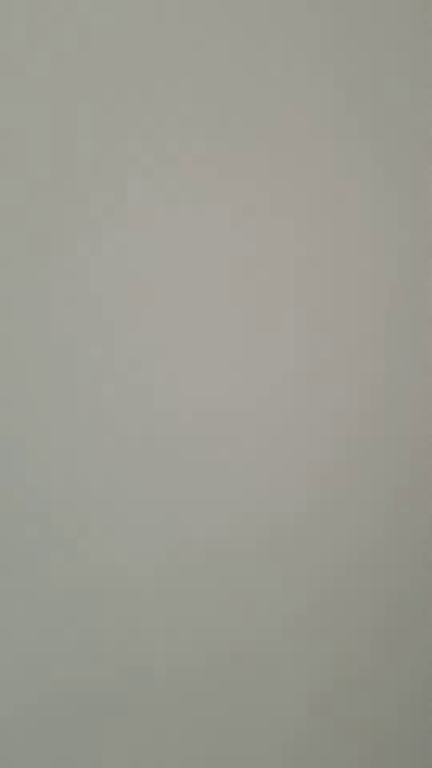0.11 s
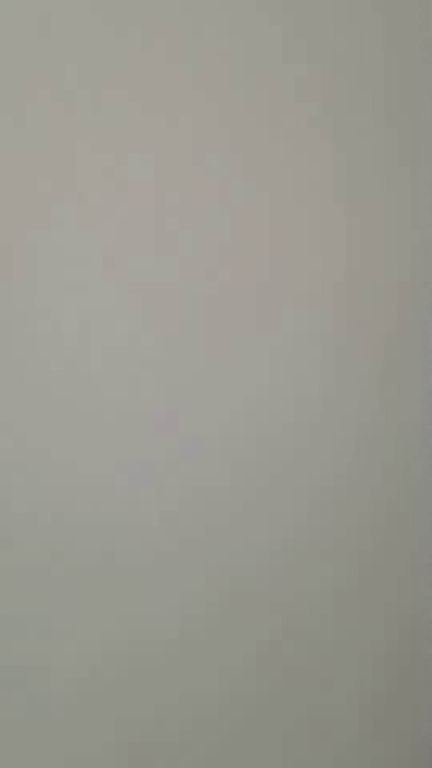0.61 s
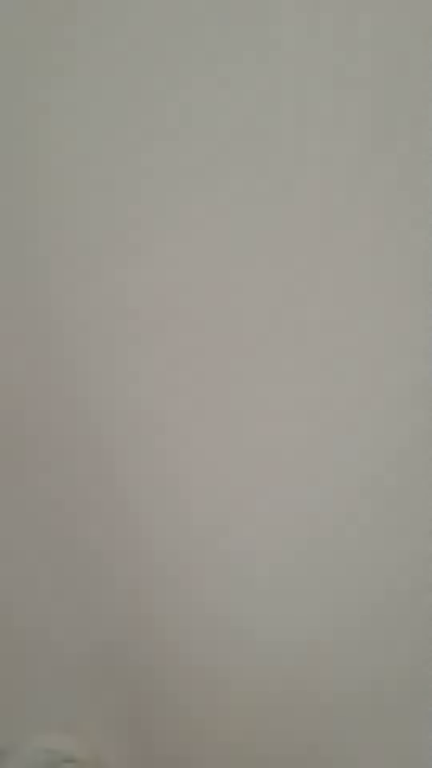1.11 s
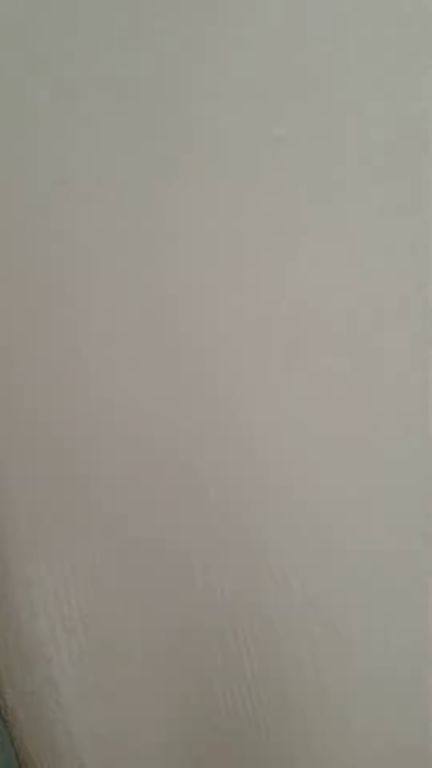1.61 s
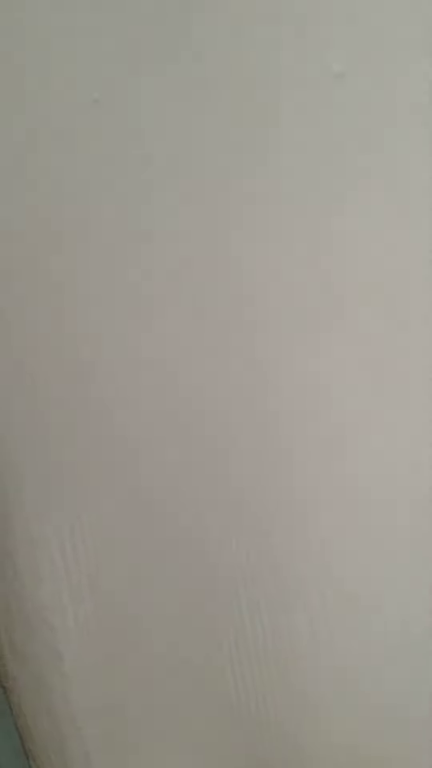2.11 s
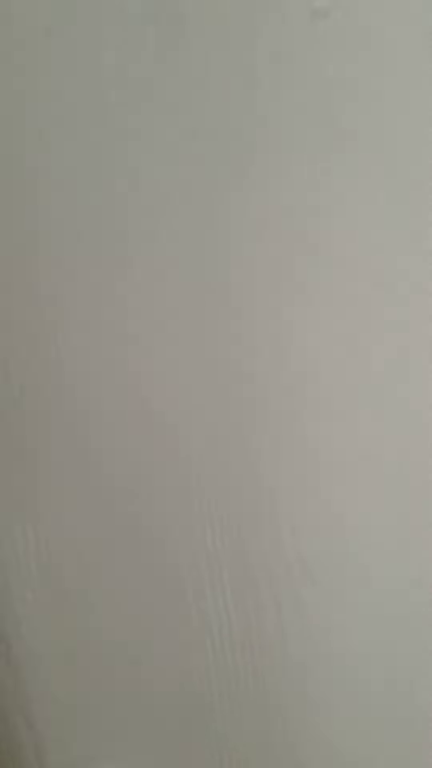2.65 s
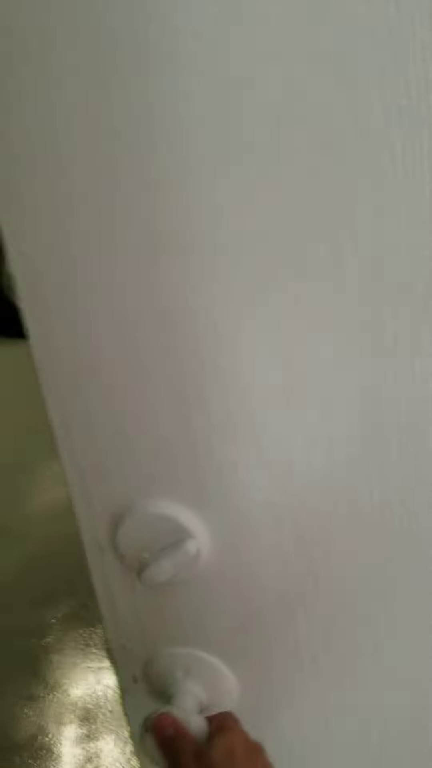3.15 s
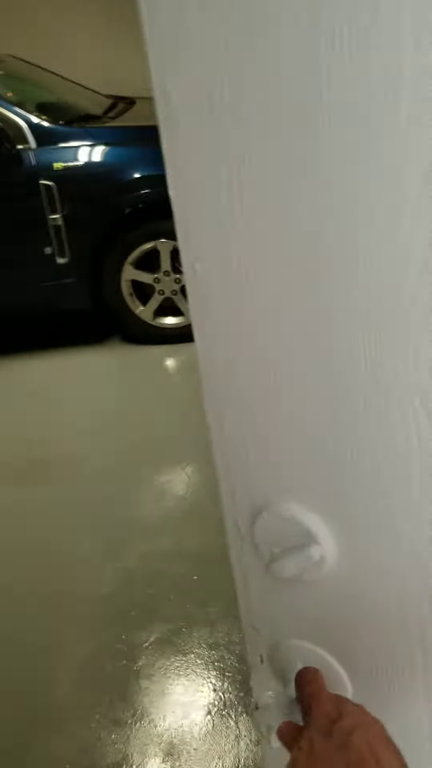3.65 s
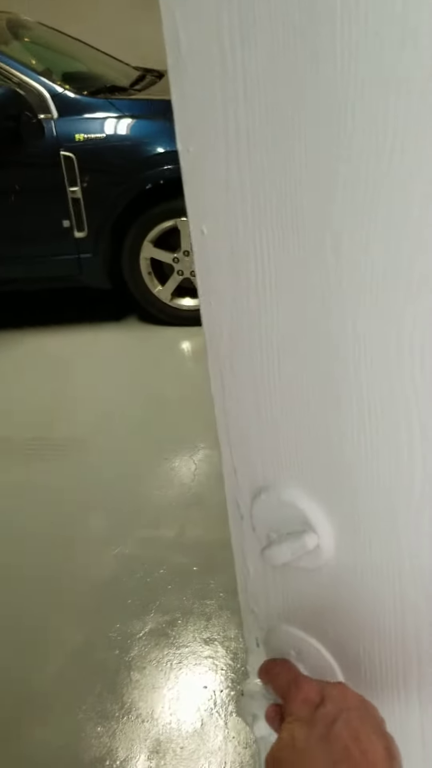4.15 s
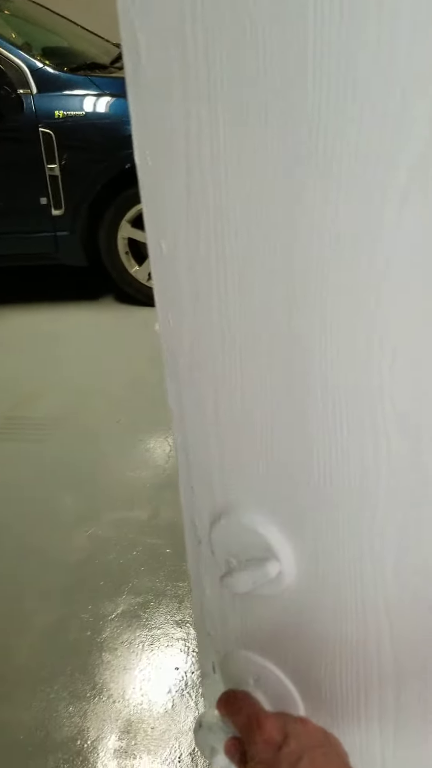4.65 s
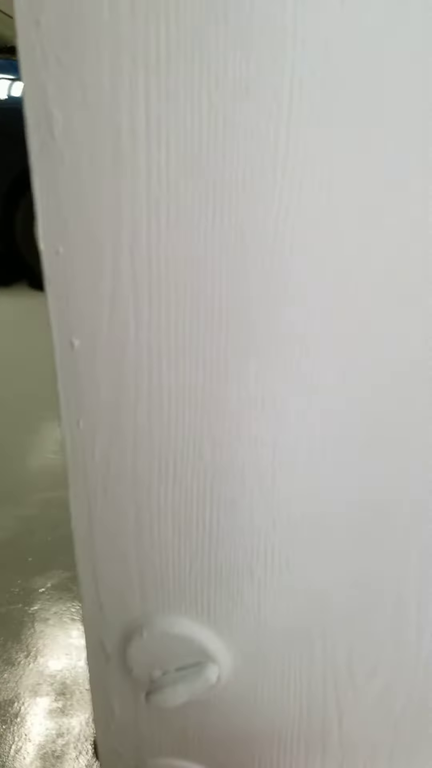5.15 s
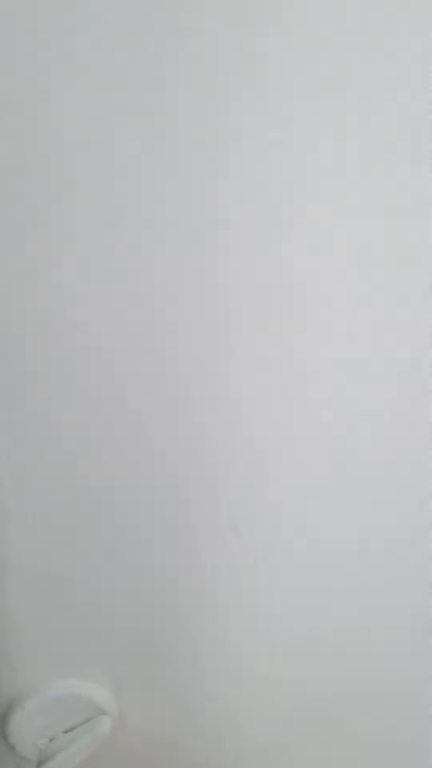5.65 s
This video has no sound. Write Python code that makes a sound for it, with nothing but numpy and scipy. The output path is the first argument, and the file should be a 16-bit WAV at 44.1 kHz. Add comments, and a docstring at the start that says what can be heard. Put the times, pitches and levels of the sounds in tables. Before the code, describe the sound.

Handheld stereo microphone near a door leading to a garage. Quiet rumble and thin hiss, soft handling taps, a small lock click. Then knob and latch rattle, the seal scrapes free, metal clacks and wooden thumps pile up, the hinges judder softly. Nearly two seconds of hush with a faint drone, then a brief rubbing groan and a hard, bright latch clack, abruptly ending.

```python
"""A few soft taps close by come first, then a hand works the lock and knob of a heavy painted door, pulls it
out of its seal, holds it open and pushes it back. Clicks and knocks are noisy contacts that ring the modes of
lock and leaf; the rubbing seal is grainy noise, the hinges judder in low jolts, and the sweep groans on the sill
by slipping many times a second. Moving air, a house rumble and a thin hiss lie below as coloured noise; they sink
while the door stands open and again at the very end. A steady drone comes from the next space."""
import sys
import numpy as np
from scipy import signal
from scipy.fft import rfft, irfft
from scipy.io import wavfile

SR = 44100
rng = np.random.default_rng(int(sys.argv[2]) if len(sys.argv) > 2 else 0)


def master_out(mix):
    """Clip the mix to full scale and print it as 16-bit PCM to the path in sys.argv[1]."""
    frames = np.transpose(np.atleast_2d(mix))
    ceiling = np.clip(frames, -1, 1)
    pcm = np.round(ceiling * 32767).astype(np.int16)
    wavfile.write(sys.argv[1], SR, pcm)


def elevation(decibels):
    """Turn decibel levels (scalar or array-like) into linear amplitude ratios."""
    levels = np.asarray(decibels, float)
    return 10 ** (levels / 20)


N = 254016   # samples, 5.76 s

# modes of the door leaf: pitch_hz, level_db, t60_s
LEAF_MODES = [(125, -16.5, 0.053), (149.7, -6.5, 0.18), (220.5, -0.5, 0.041), (320, 1.5, 0.032),
              (351.4, -4, 0.082), (398, -8, 0.065), (474, -7, 0.063)]
# bright spectrum shared by the metal cracks and the rubbing: pitch_hz, level_db (per Hz)
SHEEN_SPECTRUM = [(2500, -17), (3500, 4), (4400, 3), (5600, -0.5), (7600, -1.5), (8500, -5.5), (9300, -1),
                  (12200, 0.5), (15700, -2.5), (16200, -44)]


def rms_one(x):
    """Scale to unit power."""
    return x / np.sqrt(np.mean(x ** 2) + 1e-20)


def peak_one(x):
    """Scale to unit height."""
    return x / np.max(np.abs(x))


def in_time(rows, before=None, after=None):
    """Read the columns of a curve at every sample; the first column is time in seconds."""
    s, *columns = np.transpose(rows)
    return [np.interp(np.arange(N) / SR, s, column, before, after) for column in columns]


def at_hz(points, hz):
    """Read a spectrum on a log-frequency axis."""
    point_hz, value = np.transpose(points)
    return np.interp(np.log(hz), np.log(point_hz), value)


def add(out, s, sound):
    """Mix a sound in at its time in seconds."""
    at = round(s * SR)
    out[:, at:at + sound.shape[1]] += sound[:, :N - at]


def panned(x, db):
    """Place a sound by its level difference, left minus right, in dB."""
    return x * elevation([[db / 2], [-db / 2]])


def drift(rate_hz):
    """Slow random wander of spread 1: white noise through two equal poles, run at SR / 40."""
    pole = np.exp(-80 * np.pi * rate_hz / SR)
    settle = 2000   # slow samples dropped while the filter settles
    noise = rng.standard_normal(N // 40 + settle + 2)
    slow = signal.lfilter([1], [1, -2 * pole, pole ** 2], noise)[settle:]
    return np.interp(np.arange(N) / 40, np.arange(len(slow)), rms_one(slow))


def ring(force, hz, t60):
    """A click sets a sine of about its height ringing; nothing passes far below the pitch."""
    radius = elevation(-60 / (max(t60, .002) * SR))
    turn = 2 * np.pi * hz / SR
    return signal.lfilter([.5, 0, -.5], [1, -2 * radius * np.cos(turn), radius ** 2], force + 1e-18)


def tinted(x, spectrum):
    """Pass a short sound through a spectrum, without shifting its phase."""
    hz = np.maximum(np.arange(x.shape[-1] // 2 + 1) * SR / x.shape[-1], 1)
    return irfft(rfft(x) * elevation(at_hz(spectrum, hz)), x.shape[-1])


def coloured(spectrum, lumpy_db, grain_db):
    """Stereo noise of a given spectrum and grain, wavering in level; rms 1."""
    # how alike the two microphones hear a noise: pitch_hz, likeness (1 = the same in both)
    likeness = [(75, 0.71), (125, 0.92), (300, 0.86), (600, 0.53), (1500, 0.0), (16000, 0)]
    hz = np.maximum(np.arange(N // 2 + 1) * SR / N, 1)
    grains = elevation(grain_db * np.minimum(rng.exponential(1, N), 6))
    mid, side = rfft(rng.standard_normal((2, N)) * grains) * elevation(at_hz(spectrum, hz))
    alike = np.clip(at_hz(likeness, hz), -1, 1)
    pair = np.sqrt(1 + alike) * mid + np.sqrt(1 - alike) * side * [[1], [-1]]
    waver_db = lumpy_db * (drift(24) + drift(1.64))
    return rms_one(irfft(pair, N) * elevation(waver_db))


def rattle(t60, rise_s):
    """A short dying run of uneven contacts, with separate noise left and right."""
    t = np.arange(SR // 3) / SR
    dying = (1 - np.exp(-t / rise_s)) * elevation(-60 * t / max(t60, .002))
    uneven = elevation(2.78 * np.minimum(rng.exponential(1, len(t)), 5))
    return rng.standard_normal((2, len(t))) * dying * uneven


def struck_modes(force, modes, centre_hz, slope_db, reach):
    """Modes near the pitch of the blow ring most; the contact is too soft to reach far above it."""
    lowpass = signal.butter(4, min(reach * centre_hz, 9500), fs=SR, output="sos")
    soft = signal.sosfilt(lowpass, force)
    out = 0
    for (hz, db, t60), spread_db in zip(modes, rng.normal(0, 2, len(modes))):
        off_centre_db = slope_db * np.log2(hz / centre_hz) ** 2
        out = out + elevation(db + spread_db - off_centre_db) * ring(soft, hz, t60)
    return peak_one(out)


def clicks():
    """Latch, bolt and knob: each click is a rattle that rings the lock and cracks in the treble."""
    # modes of the lock: pitch_hz, level_db, t60_s
    lock_modes = [(650, 4, 0.024), (923, 5.5, 0.016), (1050, 3, .018), (1180, 4, 0.02), (1458, 10, 0.012),
                  (1740, 4.5, 0.026), (1950, 3.5, 0.032), (2080, 8, 0.018), (2450, 1, .012),
                  (2760, -2, 0.021), (3170, 3, 0.013), (3660, -1, 0.016), (4350, 10, 0.018),
                  (5300, 4.5, 0.0072), (6000, 2, 0.0026)]
    # start_s, lock_db and crack_db (peaks before panning), rattle_t60_s, lock_pitch_hz,
    # crack_tilt_db (per octave, about 7600 Hz)
    click_rows = [(0.214, -39, -29, 0.0075, 1500, 10), (0.4313, -43, -43, 0.0055, 2200, -10),
                  (1.156, -37, -58, 0.02, 1820, 3), (1.3819, -15.5, -20, 0.054, 2430, 2),
                  (1.389, -20.5, -25, 0.12, 1920, -9), (1.399, -26.5, -41, 0.23, 1150, -19),
                  (2.352, -30, -34, 0.011, 1960, -1), (2.376, -25, -30, 0.045, 1310, -6.5),
                  (2.384, -21.5, -37, 0.0044, 3100, -1), (2.388, -20, -21.5, 0.024, 1493, 3),
                  (2.411, -25, -22, 0.014, 1430, -7.5), (2.414, -22, -24, 0.08, 1180, 0),
                  (2.486, -22, -21.5, 0.083, 1560, 0), (2.498, -19.5, -36, 0.034, 1210, 0),
                  (2.5825, -30, -5, 0.015, 2500, 14), (2.588, -23, -10, 0.11, 2520, 16),
                  (2.6, -25, -15.5, 0.11, 3050, -9.5), (2.616, -9, -30, 0.12, 1050, -6.5),
                  (2.715, -6.5, -37, 0.024, 1530, -7), (2.73, -39, -15.5, .02, 1500, 11),
                  (2.769, -52, -20, 0.041, 1290, 7), (2.785, -26, -48, 0.017, 2300, -5),
                  (2.806, -21, -40, 0.083, 1060, -4), (2.928, -13.5, -25, 0.087, 1180, 8),
                  (3.16, -32, -29.5, 0.015, 1090, -13), (3.229, -26.5, -28.5, 0.41, 1650, -8),
                  (3.353, -12.5, -27.5, 0.059, 860, -6), (3.4166, -21.5, -30, 0.022, 2520, 9),
                  (5.468, -38, -32, 0.016, 4110, -10), (5.58, -10.5, -12, 0.076, 1980, -3),
                  (5.603, -26, -42, 0.11, 670, 3), (5.615, -37, -13.5, .036, 2200, -0.5),
                  (5.661, -43, -7, 0.022, 2950, -16), (5.664, -7, 1, 0.066, 2720, 0),
                  (5.725, -17.5, -27, 0.18, 1760, 5)]
    lock_side_db, crack_side_db = -5, -1.5   # left minus right
    first_touch = 0.7   # strength of the first touch against the rattle after it
    left_lag = 12   # samples by which the touch reaches the left side later
    lead = 64   # samples kept ahead of the touch for the filters that keep the phase
    out, t = np.zeros((2, N)), np.arange(SR // 3) / SR
    for s, lock_db, crack_db, t60, lock_hz, tilt_db in click_rows:
        force = np.roll(rattle(t60, rise_s=.0005), lead, axis=1)
        touch = np.zeros_like(force)
        touch[[0, 1], [lead + left_lag, lead]] = first_touch * np.linalg.norm(force, axis=1)
        metal = struck_modes(force + touch, lock_modes, lock_hz, slope_db=6.0, reach=2.2)
        sharp = force * (1 + 4.4 * np.exp(-t / 0.0014))   # sharpest at first
        tilted = [(hz, db + tilt_db * np.log2(hz / 7600)) for hz, db in SHEEN_SPECTRUM]
        crack = peak_one(tinted(sharp, tilted))
        click = elevation(lock_db) * panned(metal, lock_side_db) + elevation(crack_db) * panned(crack, crack_side_db)
        add(out, s - lead / SR, click)
    return out


def knocks():
    """Dull knocks: a softer run of contacts, nearly alike left and right, thumps the modes of the leaf."""
    # start_s, peak_db, pitch_hz, contact_t60_s
    knock_rows = [(2.581, -27.5, 125, 0.062), (2.617, -21, 320, 0.088), (2.637, -21, 490, 0.051),
                  (2.714, -14.5, 520, 0.0098), (2.733, -28, 140, 0.034), (2.8, -20, 244, 0.062),
                  (2.821, -13, 405, 0.016), (2.93, -18.5, 155, 0.061), (3.23, -29, 143, 0.32),
                  (3.333, -28, 300, 0.041), (3.354, -23, 244, 0.086), (5.579, -23.5, 374, 0.13),
                  (5.603, -25, 360.4, 0.093), (5.724, -33.5, 324, 0.17)]
    out = np.zeros((2, N))
    for s, db, leaf_hz, t60 in knock_rows:
        force = rattle(t60, rise_s=.003)
        shared = force[0] + 0.21 * force
        add(out, s, elevation(db) * struck_modes(shared, LEAF_MODES, leaf_hz, slope_db=4.9, reach=1.68))
    return out


def rubbing():
    """Dense grains of friction: a middle body, a bright sheen and the leaf shuddering along."""
    # seal and fittings as the door is pulled free, the knob let go, the door pushed home;
    # one list a stroke: time_s, middle_level_db, treble_level_db
    strokes = [
        [(2.3, -55, -85), (2.37, -43.5, -48), (2.43, -35.5, -44), (2.48, -44.5, -49), (2.51, -47, -59),
         (2.57, -39.5, -44), (2.61, -28.5, -24.5), (2.645, -24.5, -32), (2.69, -39.5, -38), (2.76, -49, -39),
         (2.85, -37.5, -43), (2.95, -40.5, -49.5), (3.03, -54, -56)],
        [(3.1, -66, -83), (3.15, -48.5, -63), (3.18, -41.5, -42), (3.235, -43, -43), (3.27, -42.5, -54),
         (3.34, -38, -51.5), (3.4, -39, -53.5), (3.46, -48, -60), (3.6, -57, -85), (3.8, -66.5, -99)],
        [(5.25, -61.5, -62), (5.44, -48, -61), (5.47, -41.5, -53), (5.57, -44, -52), (5.6, -32, -35.5),
         (5.655, -39, -38), (5.7, -38.5, -34), (5.76, -41.5, -38)],
    ]
    # middle body of the friction: pitch_hz, level_db (per Hz)
    body_spectrum = [(300, -42), (500, -5.5), (900, 1.5), (1200, 5.5), (2200, 0), (3200, -4.5),
                     (4500, -12.5), (8000, -30)]
    shudder_db, shudder_follows = -45.5, 0.77   # the leaf at a rub of -40 dB; share of the rub's swing
    middle = coloured(body_spectrum, lumpy_db=1.16, grain_db=3.0)
    sheen = coloured(SHEEN_SPECTRUM, lumpy_db=0.98, grain_db=2.5)
    push = rng.standard_normal((2, N))
    shared = push[0] + 0.316 * push
    shudder = rms_one(sum(elevation(db) * ring(shared, hz, t60) / np.sqrt(t60) for hz, db, t60 in LEAF_MODES))
    out = 0
    for stroke in strokes:
        db, bright_db = in_time(stroke, -140, -140)
        leaf_db = shudder_db + shudder_follows * (db + 40)
        out = out + elevation(db) * middle + elevation(bright_db) * sheen + elevation(leaf_db) * shudder
    return out


def groan():
    """The sweep sticks and slips on the sill at a near-steady rate; every slip knocks its broad resonances."""
    # time_s, slips_per_s, slip_level_db, brightness_db (per octave, about 500 Hz)
    slip_rows = [(5.245, 186, -66, 3), (5.27, 169, -49.5, 2), (5.298, 171, -45, 4), (5.315, 179, -51, -4),
                 (5.34, 177, -47.5, 1), (5.362, 194, -46, 4.5), (5.385, 177, -46, 0),
                 (5.405, 157, -40, 1.5), (5.445, 161, -41, 6), (5.475, 107, -40.5, 9.5),
                 (5.575, 112, -38.5, 9.5)]
    # resonances of the sweep: pitch_hz, width_hz, level_db
    resonances = [(204, 230, 12), (358, 175, 10.5), (483, 164, 4), (726, 113, 0), (1050, 160, -5),
                  (1610, 840, -12.5)]
    per_s, _, tilt_db = in_time(slip_rows)
    _, slip_db, _ = in_time(slip_rows, -140, -140)
    cycles = np.cumsum(per_s * (1 + .012 * drift(60))) / SR
    slipping = np.diff(np.floor(cycles), prepend=0) > 0
    slips = slipping * elevation(slip_db + 1.1 * rng.standard_normal(N))
    out = 0
    for k, (hz, width_hz, db) in enumerate(resonances):
        knock = slips * elevation(db + tilt_db * np.log2(hz / 500))
        out = out + (-1) ** k * ring(knock, hz, 3.07 / width_hz)   # neighbours in opposite sign
    return out


def judder():
    """The swinging leaf judders on its hinges: soft low jolts, each gap a little shorter than the last."""
    start_s, gap_s, quickens = 3.447, .0475, .955
    push_db, loss_db, spread_db = -21.5, 1.2, 2.9   # first push, mean loss at each jolt, random spread
    pitch_hz, t60_s = 109, 0.038
    k = np.arange(8)
    s = start_s + np.cumsum(gap_s * quickens ** k) - gap_s
    push = np.zeros(N)
    push[(s * SR).astype(int)] = elevation(push_db - loss_db * k + rng.normal(0, spread_db, len(k)))
    soft = signal.sosfilt(signal.butter(2, 0.88 * pitch_hz, fs=SR, output="sos"), push + 1e-18)
    return ring(soft, pitch_hz, t60_s)


def taps():
    """Soft single taps close by: each is one damped, soft-edged push of a few cycles."""
    # start_s, push_db (before softening and panning), pitch_hz, left_minus_right_db
    tap_rows = [(.0095, -32.5, 420, 24), (0.2155, -27, 484, 8), (0.389, -35, 334, 14),
                (0.425, -26, 348, 14), (0.4318, -24.5, 770, 12)]
    out = np.zeros((2, N))
    for s, db, hz, pan_db in tap_rows:
        push = np.zeros(N)
        push[round(s * SR)] = elevation(db)
        soft = signal.sosfilt(signal.butter(1, 0.91 * hz, fs=SR, output="sos"), push + 1e-18)
        out += panned(ring(soft, hz, 4.6 / hz), pan_db)
    return out


def room(x):
    """A dense tail, with separate noise left and right, that dies at its own rate in each octave."""
    # pitch_hz, t60_s
    decay_rows = [(150, 0.87), (2000, 0.63), (6000, 0.24)]
    t, tail = np.arange(SR // 2) / SR, 0
    edges_hz = 60 * 2. ** np.arange(9)
    for low, high in zip(edges_hz, edges_hz[1:]):
        octave = signal.butter(2, [low, high], "band", fs=SR, output="sos")
        decay = elevation(-60 * t / at_hz(decay_rows, np.sqrt(low * high)))
        noise = signal.sosfilt(octave, rng.standard_normal((2, len(t))))
        tail = tail + noise * decay * (t > .006)   # silent for the first 6 ms
    tail = tail / np.sqrt(np.sum(tail ** 2) / 2)
    return signal.fftconvolve(x, tail, axes=1)[:, :N]


def gusts():
    """Strength of the air pushed by the swinging leaf: each push swells to its peak and ebbs."""
    # peak_s, level_db, rise_s, fall_s (both times to 1/e)
    gust_rows = [(2.7, -40, .12, 0.13), (3.63, -37.5, 0.041, 0.033), (5.69, -41, 0.049, 0.049)]
    t, out = np.arange(N) / SR, 0
    for s, db, rise_s, fall_s in gust_rows:
        out = out + elevation(db) * np.exp(-np.abs(t - s) / np.where(t < s, rise_s, fall_s))
    return out


def background():
    """Air, rumble, house and hiss are coloured noises that sink by their own shares; the drone holds steady."""
    # spectra of the five layers: pitch_hz, level_db (per Hz)
    air_spectrum, rumble_spectrum, house_spectrum = [(12, -47), (25, -14), (45, -5), (65, -4), (90, -5.5),
                                                     (130, -37.5), (300, -77)], [(60, -44), (95, -5), (120, 8), (130, -6),
                                                                  (150, -1), (170, -3.5), (198, -1),
                                                                  (230, -10.5), (300, -10.5), (450, -53)], [(150, -30), (280, -5),
                                                                                  (350, -2), (500, -5.5),
                                                                                  (750, -6.5), (1400, -6.5),
                                                                                  (2100, -9.5),
                                                                                  (2600, -11.5),
                                                                                  (5000, -13.5),
                                                                                  (9000, -68)]
    hiss_spectrum = [(500, -42), (1500, -9), (3000, 0), (5000, 1.5), (6500, 1.5), (8500, 1.5), (9500, 5),
                     (12500, 2.5), (15700, 4), (16200, -30.5)]
    drone_spectrum = [(220, -47.5), (340, -2), (520, -1.5), (750, -21)]   # steady drone from the next space
    # sinking before each layer takes its share: time_s, level_db
    sink_rows = [(0, -1), (.5, 0), (2.3, -2.5), (3.5, -4), (3.8, -9.5), (4.2, -16.5), (4.7, -17.5),
                 (5.15, -14), (5.6, -1), (5.76, -17)]
    sink_db, = in_time(sink_rows)
    air = elevation(-55 + sink_db)
    rumble = elevation(-50.5 + 1.21 * sink_db)
    house = elevation(-53 + 0.89 * sink_db)
    hiss = elevation(-54.5 + 0.52 * sink_db)
    gust = gusts()
    out = (air + gust) * coloured(air_spectrum, lumpy_db=0.39, grain_db=0)
    out += (rumble + elevation(-6) * gust) * coloured(rumble_spectrum, lumpy_db=0.58, grain_db=0)
    out += elevation(-67.5) * coloured(drone_spectrum, lumpy_db=2.2, grain_db=0)
    out += house * coloured(house_spectrum, lumpy_db=1.0, grain_db=0)
    return out + hiss * coloured(hiss_spectrum, lumpy_db=0.32, grain_db=0)


def scene():
    """Clicks, knocks, taps, groan and judder with their room; rubbing and background without it."""
    struck = clicks() + knocks() + taps() + groan() + judder()
    return struck + elevation(-13) * room(struck) + rubbing() + background()


def low_pass(x):
    """Removes everything above the highest recorded frequency."""
    return signal.sosfilt(signal.butter(12, 17000, fs=SR, output="sos"), x)


def record(dry):
    """Peaks are rounded softly."""
    rounded = 1.507 * np.tanh(dry / 1.506)
    return low_pass(rounded)


dry = scene()
out = record(dry)
master_out(out)
```